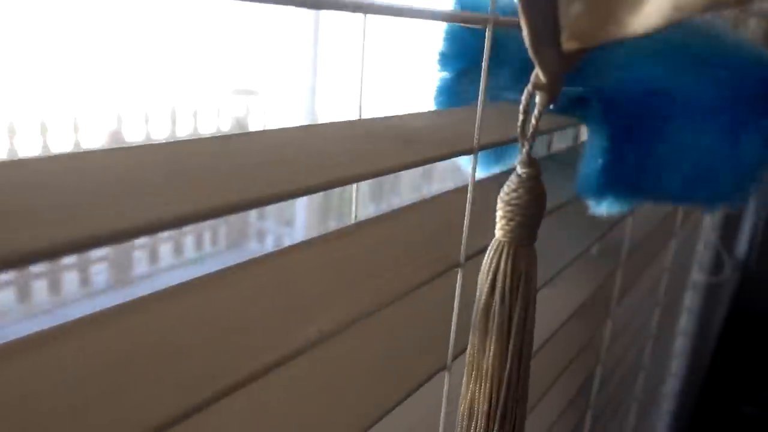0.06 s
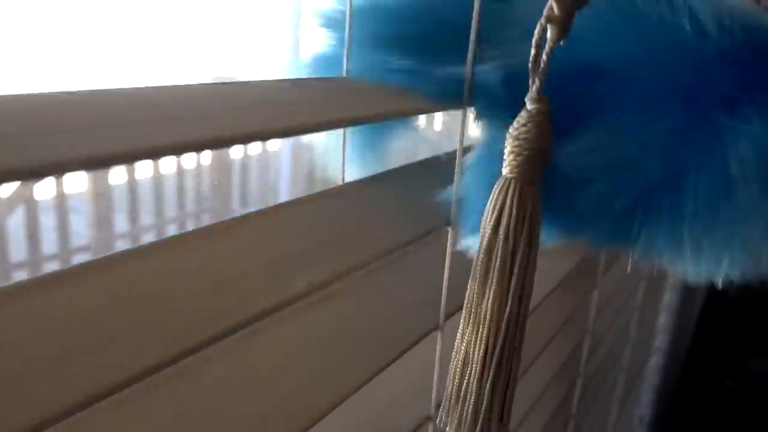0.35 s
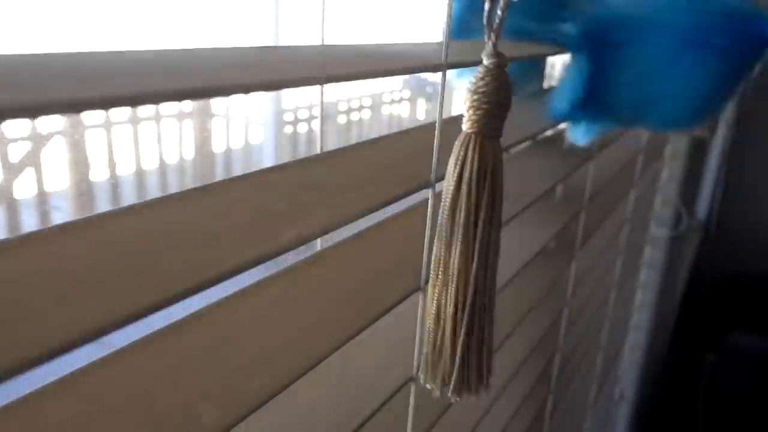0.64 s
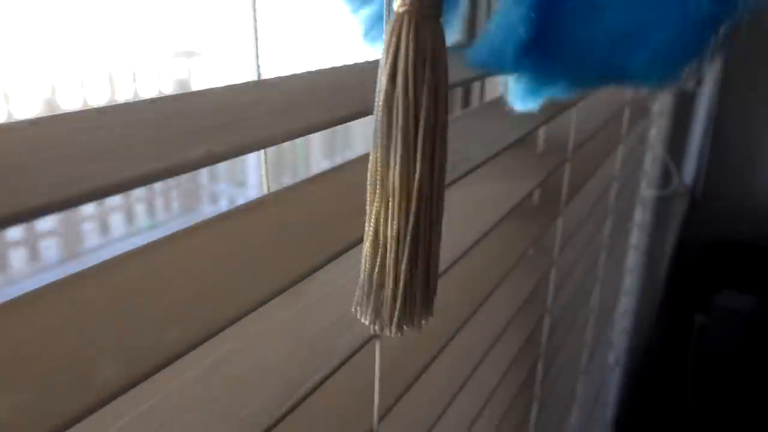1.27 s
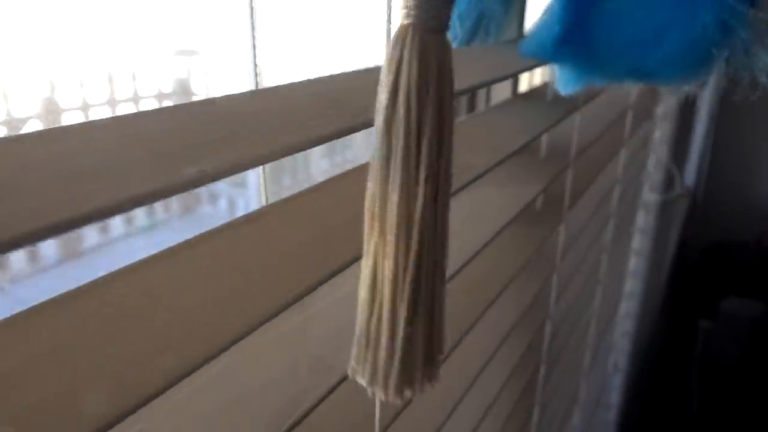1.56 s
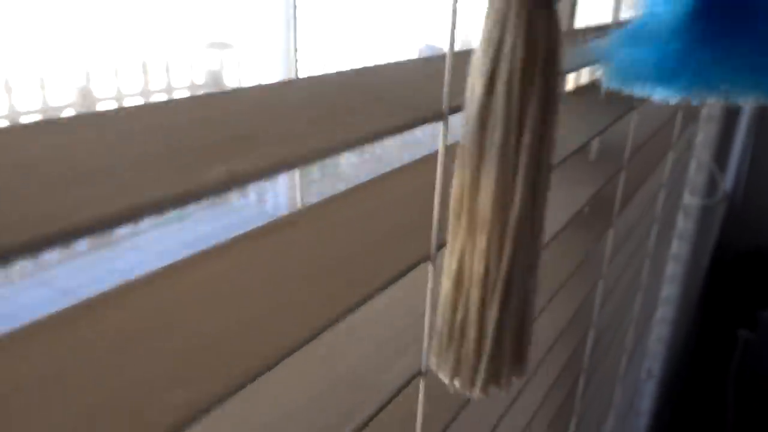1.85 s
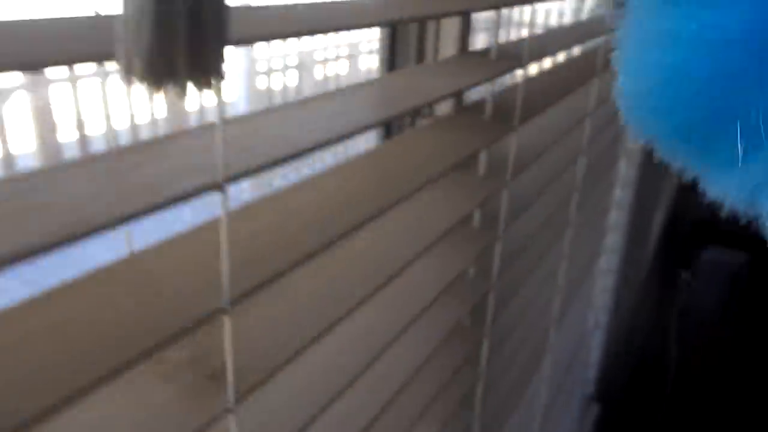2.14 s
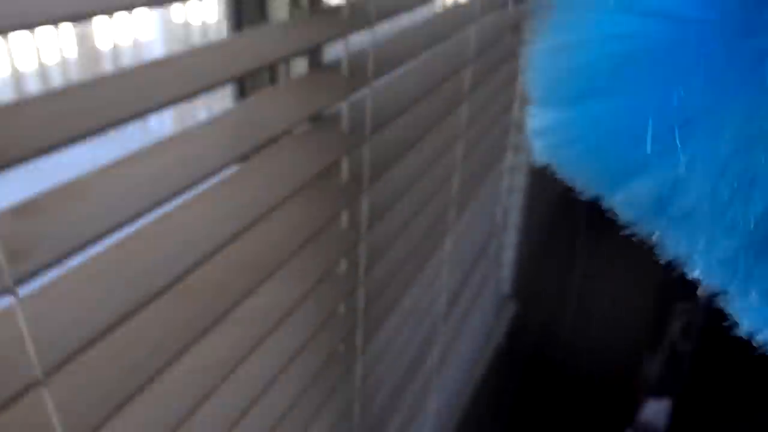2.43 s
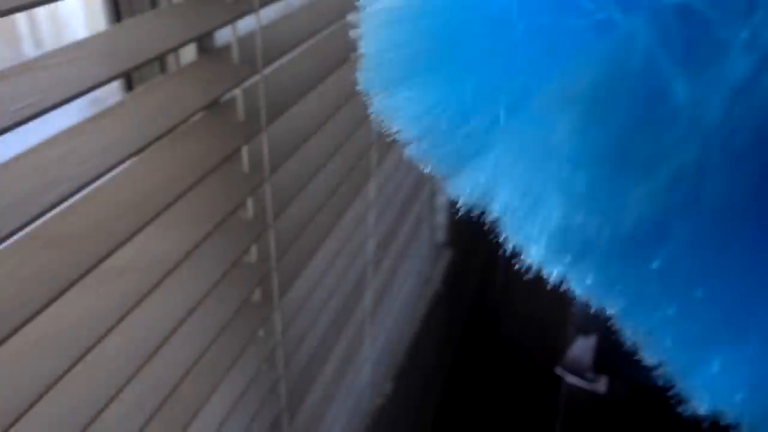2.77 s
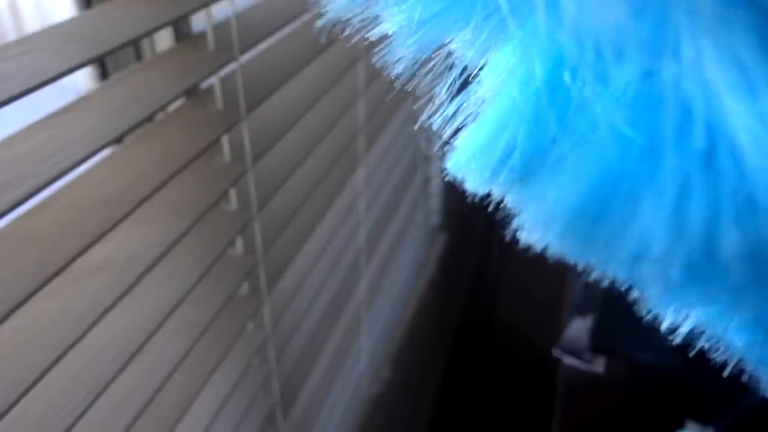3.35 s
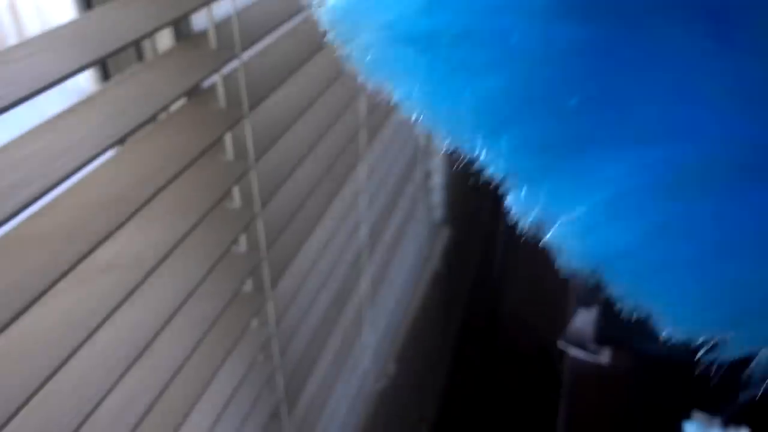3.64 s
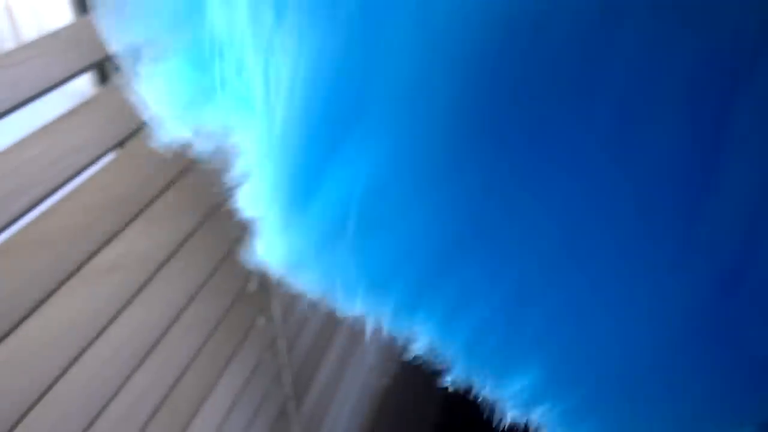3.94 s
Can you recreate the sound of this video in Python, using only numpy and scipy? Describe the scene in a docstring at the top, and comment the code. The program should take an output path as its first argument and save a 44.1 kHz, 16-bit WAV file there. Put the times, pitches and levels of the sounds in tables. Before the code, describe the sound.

A fluffy duster swishes to and fro along window blinds, close to the microphone in a small quiet room. The slats knock and chatter with each stroke, then the duster only rustles faintly over a low rumble.

```python
"""A soft hiss and a clatter of slats: a fluffy duster sweeps to and fro along window blinds,
close to the microphone in a small, quiet room. Its fibres flick over the slats with each stroke,
and the slats knock and chatter against each other, with a short room tail behind them.
Then the duster is drawn back and only rustles faintly, over a low rumble and a soft hum."""
import sys
import numpy as np
from scipy import signal
from scipy.io import wavfile

SR = 44100
rng = np.random.default_rng(int(sys.argv[2]) if len(sys.argv) > 2 else 0)


def unload_wav(signal):
    """Save mono or channel-first audio to the path in sys.argv[1] as 16-bit WAV at rate SR, clipped to [-1, 1]."""
    wavfile.write(
        sys.argv[1],
        SR,
        np.round(np.clip(np.atleast_2d(signal).T, -1, 1) * 32767).astype(np.int16),
    )


N = 176400

# strokes along the slats, and snags as the duster pulls free (start [s], fastest [s], end [s], level [dB])
DUSTER_STROKES = [(-.09, .11, 0.22, -57.5), (.215, .375, 0.45, -51.5), (.4, .423, .44, -56),
                  (.44, .64, 0.74, -53), (.725, .89, 1.044, -52.5), (.94, 1.0, 1.054, -61),
                  (1.04, 1.29, 1.543, -56), (1.56, 1.61, 1.71, -70.5), (1.69, 1.83, 1.975, -60.5)]
# light brushes of the fluff (start [s], fullest [s], end [s], level [dB])
FLUFF_BRUSHES = [(1.9, 2.03, 2.64, -75.5), (2.46, 2.475, 2.75, -71), (2.54, 2.6, 1.9, -96),
                 (2.695, 2.715, 2.73, -74), (2.735, 2.747, 2.78, -71), (2.76, 2.79, 2.94, -79),
                 (2.9, 2.925, 3.03, -71), (3.46, 3.64, 3.69, -75.5), (3.683, 3.691, 3.705, -70),
                 (3.7, 3.735, 3.8, -75), (3.76, 3.8, 3.93, -79), (3.86, 3.98, 4.15, -73)]
# fibres on the slats (frequency [Hz], relative density [dB])
HISS_SPECTRUM = [(1200, -13), (1800, -4), (2400, -15.5), (3400, -12.5), (4500, -8.5), (5600, -4.5),
                 (6900, -6), (8500, -2.5), (10000, -1), (12500, -5.5), (15500, -7)]
# the fluff alone (frequency [Hz], relative density [dB])
FLUFF_SPECTRUM = [(2500, -21), (4200, -10.5), (5500, -10), (7800, -4.5), (10200, -3.5), (12500, -6.5),
                  (15500, -15)]
# slat against slat (time [s], level [dB], thump boost [dB], body boost [dB], treble boost [dB])
SLAT_KNOCKS = [(.0272, -31.5, -2, -3, -2.5), (.0342, -28, 5, 2, -6), (0.3418, -41, 7, 2, -20),
               (0.418, -40, 11, 2, 16), (.424, -49, 17, -7, -3), (.441, -40.5, 16, 7.5, 3),
               (.513, -46, 15, 3, -19), (0.52, -32.5, 3.5, -4.5, -16), (0.644, -43, 3, 8.5, -17),
               (0.6594, -31.5, 0, -13, -12), (.673, -30, -3.5, -6, -9.5), (0.6866, -37, -2, -5, -3.5),
               (0.9099, -40.5, 15, 8.5, -9), (.9133, -36.5, 7, 10, 6), (1.0191, -33.5, 7, 1, 10),
               (1.1085, -39.5, 5.5, 2, -2.5), (1.258, -31.5, -4, 1, -3), (1.2607, -29.5, -4, 4.5, -14),
               (1.2632, -32, -4, 5, -4), (1.274, -31.5, -2, -12, 4.5), (1.459, -39, -10.5, 0, -5),
               (1.523, -46.5, -16, 3, -4), (1.5865, -50, 1, 13, -8), (1.66, -46.5, 0, -9.5, -8),
               (1.843, -46.5, -5, -23, 4.5), (1.957, -53, 3.5, -3, 6.5), (2.1282, -37.5, 1, 5, -11),
               (2.141, -52.5, 10, 13, 2), (2.187, -47.5, 8.5, -10, -11), (2.2479, -44, 1, 1.5, -11),
               (2.6195, -56, -2, 7, 11)]
# a slat edge drags (start [s], strongest [s], end [s], level [dB], bass boost [dB], treble boost [dB])
EDGE_DRAGS = [(0.45, 0.544, 0.56, -48, 1, -1), (1.213, 1.203, 1.264, -45, -3, 1.5),
              (1.432, 1.445, 1.505, -48, -2.5, 3.5), (1.58, 1.588, 1.664, -48, 2.5, -0.5),
              (1.84, 1.845, 1.65, -50, -11, 3), (2.043, 2.128, 2.2, -57.5, 7.5, -7),
              (2.613, 2.622, 2.71, -63.5, 11.5, 3), (2.684, 2.727, 2.8, -59.5, 9, -8),
              (3.978, 3.976, 3.986, -62, -7, 17)]
# low modes of the blind (frequency [Hz], level [dB], t60 [s])
SLAT_MODES = [(158.2, -18.5, 0.18), (196.4, -10, 0.078), (233.7, -8.5, 0.091), (299.6, -15.5, 0.12),
              (357.5, -7, 0.092), (430, -5.5, 0.051), (669, -11.5, 0.077), (765, -3.5, 0.05),
              (966, -2, 0.029), (1139, -24, 0.09), (1430, -12, 0.028)]
# high modes of the slats, too dense to hear singly (frequency [Hz], relative density [dB])
CLACK_SPECTRUM = [(1000, 2.5), (1500, 3.5), (1900, -3.5), (2600, -5.5), (3300, -13), (4500, -15),
                  (7000, -26.5), (15000, -59)]
# still air in the room (frequency [Hz], relative density [dB])
AIR_SPECTRUM = [(110, -7), (150, -19), (220, -10.5), (380, -13.5), (550, -13), (800, -20.5), (1400, -24.5),
                (2200, -28.5), (3500, -36.5), (6000, -41), (15000, -44)]
# low rumble and hum (centre [Hz], width [Hz], level [dB])
RUMBLE_BANDS = [(19.8, 11, -47), (36.6, 2.7, -43), (75.6, 7.9, -45.5), (112.7, 11.5, -57.5),
                (368.3, 9, -68.5)]
# stereo width at the microphone (frequency [Hz], left-right likeness [0..1])
MIC_LIKENESS = [(140, 0.3), (350, 0.9), (700, 0.8), (1400, 0.97), (2500, .5), (4500, .05), (7000, 0),
                (9500, .5), (12000, 0.28), (15000, 0)]
# stereo balance at the microphone (frequency [Hz], left minus right [dB])
MIC_BALANCE = [(300, 1), (1500, 0.2), (3000, 0.5), (5600, 1), (8000, 2), (10000, -1), (12500, -2.5),
               (15000, -4.5)]

HISS_DB, KNOCK_DB, CHATTER_DB, CLACK_DB, SCUFF_DB = 1, 1.5, -4, -12, -9.5   # added to the tables' levels
THUMP_HZ, BODY_HZ, MIDDLE_HZ, TREBLE_HZ = 254, 370, 884, 1780   # ranges that a contact can favour
LN_1000 = np.log(1000)   # a fall of 60 dB


def fibres(moves, spectrum, speed_power, flicks_per_s, flutter_db, flutter_hz=21.7):
    """Fibres flick free, louder the faster the duster moves, unevenly as tufts catch."""
    flutter = rms_one(filtered(rng.standard_normal(N), flutter_hz, "low"))
    flicks = coloured(grains(flicks_per_s, (2, 2, N)), spectrum, low_hz=1095)
    return effort(moves, speed_power) * from_db(flutter_db * flutter) * flicks


def duster_hiss():
    """Thousands of fibres slip over the slats in each stroke and merge into a hiss."""
    hiss = fibres(DUSTER_STROKES, HISS_SPECTRUM, speed_power=1.06, flicks_per_s=7800, flutter_db=0.84)
    return from_db(HISS_DB) * hiss


def duster_rustle(stem_hz=335, echo=0.5):
    """Sparse ticks of the fluff run up and down the duster's stem, ringing evenly spaced modes."""
    ticks = fibres(FLUFF_BRUSHES, FLUFF_SPECTRUM, speed_power=1.1, flicks_per_s=700, flutter_db=0.5)
    round_trip = np.zeros(int(SR / stem_hz) + 1)
    round_trip[0], round_trip[-1] = 1, -echo
    return np.sqrt(1 - echo ** 2) * signal.lfilter([1], round_trip, ticks + 1e-18)


def contact_db(hz, thump_db, body_db, treble_db):
    """The place and hardness of a contact favour the low or the high modes."""
    centres = np.log([THUMP_HZ, BODY_HZ, MIDDLE_HZ, TREBLE_HZ])
    return np.interp(np.log(hz), centres, [thump_db, body_db, 0, treble_db])


def slat_knocks(scatter_db=5, detune=0.041):
    """Each knock rings the low modes of a slat; no two slats are tuned quite alike."""
    out = np.zeros(N)
    hz, mode_db, t60 = np.transpose(SLAT_MODES)
    polarity = (-1) ** (np.arange(len(hz)) // 2)
    t = np.arange(SR // 4)[:, None] / SR
    for time, db, thump, body, treble in SLAT_KNOCKS:
        scatter, mistuning = rng.standard_normal((2, len(hz)))
        levels_db = KNOCK_DB + db + mode_db + contact_db(hz, thump, body, treble) + scatter_db * scatter
        modes = np.sin(2 * np.pi * hz * (1 + detune * mistuning) * t) * np.exp(-LN_1000 * t / t60)
        knock = modes @ (polarity * from_db(levels_db))
        at = int(time * SR)
        out[at:at + len(t)] += knock[:N - at]
    return out


def slat_chatter(slips_per_s=460, shudder_db=-17):
    """Tiny slips shake the low modes: strongly when an edge drags, faintly under every stroke."""
    out = 0
    shudder = from_db(shudder_db) * effort(DUSTER_STROKES, power=1)
    for hz, mode_db, t60 in SLAT_MODES:
        drag = sum(from_db(db + contact_db(hz, bass, bass, treble)) * speed(start, peak, end) ** 2
                   for start, peak, end, db, bass, treble in EDGE_DRAGS)
        slips = (shudder + drag) * grains(slips_per_s, N)
        out = out + from_db(CHATTER_DB + mode_db) * ring(slips, hz, t60)
    return out


def slat_clacks(t60=0.048):
    """The crowded high modes give a short burst at each knock and a scuff while an edge drags."""
    t = np.arange(N) / SR
    power = np.zeros(N)
    for time, db, _, _, treble in SLAT_KNOCKS:
        decay = (t >= time) * np.exp(-LN_1000 * np.clip(t - time, 0, 1) / t60)
        power += (from_db(CLACK_DB + db + treble) * decay) ** 2
    for start, peak, end, db, _, treble in EDGE_DRAGS:
        power += (from_db(SCUFF_DB + db + treble) * speed(start, peak, end) ** 2) ** 2
    return np.sqrt(power) * coloured(rng.standard_normal((2, 2, N)), CLACK_SPECTRUM, low_hz=1027)


def room_tail(direct, level_db=-9, bass_t60=0.66, treble_t60=0.34):
    """The walls return a diffuse tail to the microphone; its treble is wider and dies sooner."""
    t = np.arange(SR) / SR
    reflections = rng.standard_normal((2, SR)) * (1 - np.exp(-t / 0.0018))
    bass = filtered(stereo(reflections, likeness=0.95), 536, "low") * np.exp(-LN_1000 * t / bass_t60)
    treble = filtered(stereo(reflections, likeness=0.3), 1180, "high") * np.exp(-LN_1000 * t / treble_t60)
    response = rms_one(bass + treble) / np.sqrt(SR)
    return from_db(level_db) * signal.fftconvolve(direct, response, axes=1)[:, :N]


def room_mode(direct):
    """One resonance of the room lingers after the knocks."""
    return from_db(-48.5) * ring(direct, hz=406.3, t60=0.9)


def room_tone(air_db=-61.5):
    """Still air all round the microphone, with narrow bands of low rumble and a faint hum."""
    out = from_db(air_db) * coloured(rng.standard_normal((2, 2, N)), AIR_SPECTRUM, low_hz=89)
    for hz, width, db in RUMBLE_BANDS:
        band = filtered(rng.standard_normal((2, N + SR)), [hz - width / 2, hz + width / 2], "band", order=1)
        band = filtered(band, 2 * hz, "low", order=4)[:, SR:]   # one second to settle
        out = out + from_db(db) * rms_one(stereo(band, likeness=0.985))
    return out


def speed(start, fastest, end):
    """A movement speeds up and slows down in two quarter sines."""
    phase = np.interp(np.arange(N) / SR, [start, fastest, end], [0, np.pi / 2, np.pi])
    return np.sin(phase).clip(0)


def effort(moves, power):
    """Strength of the rubbing through a series of movements, as a power of their speed."""
    return sum(from_db(db) * speed(start, fastest, end) ** power for start, fastest, end, db in moves)


def grains(per_s, shape, spread_db=4):
    """Random tiny clicks of uneven size; rms 1."""
    sizes = from_db(spread_db * np.minimum(rng.exponential(1, shape), 3))
    signs = rng.choice([-1, 1], shape)
    return rms_one(sizes * signs * (rng.random(shape) < per_s / SR))


def ring(force, hz, t60):
    """One mode: each push sets a decaying sine ringing."""
    radius, angle = np.exp(-LN_1000 / (t60 * SR)), 2 * np.pi * hz / SR
    feedback = [1, -2 * radius * np.cos(angle), radius ** 2]
    return signal.lfilter([0, np.sin(angle)], feedback, force + 1e-18) / np.sqrt(SR / 1000)


def coloured(sources, spectrum, low_hz):
    """Shape two noise pairs in quarter octaves, with the microphone's width and balance; mid rms 1."""
    out = 0
    edges = np.geomspace(low_hz, 17000, int(4 * np.log2(17000 / low_hz)) + 2)
    for k, (low, high) in enumerate(zip(edges, edges[1:])):
        hz = np.sqrt(low * high)
        pair = filtered(sources[k % 2], [low, high], "band", order=3)   # neighbouring bands are unrelated
        balance_db = at_hz(MIC_BALANCE, hz) * np.array([[.5], [-.5]])
        out = out + stereo(pair, at_hz(MIC_LIKENESS, hz)) * from_db(at_hz(spectrum, hz) + balance_db)
    return out / np.std(out.mean(0))


def stereo(pair, likeness):
    """Left and right from two unrelated signals, used as mid and side."""
    mid = np.sqrt((1 + likeness) / 2) * pair[0]
    side = np.sqrt((1 - likeness) / 2) * pair[1]
    return np.array([mid + side, mid - side])


def filtered(x, hz, kind, order=2):
    """Butterworth filter."""
    return signal.sosfilt(signal.butter(order, hz, kind, fs=SR, output="sos"), x + 1e-18)


def at_hz(curve, hz):
    """Read a curve on a log-frequency axis."""
    frequencies, values = np.transpose(curve)
    return np.interp(np.log(hz), np.log(frequencies), values)


def from_db(db):
    """Decibels to gain."""
    return 10 ** (np.asarray(db) / 20)


def rms_one(x):
    """Scale to rms 1."""
    return x / np.sqrt(np.mean(x ** 2) + 1e-20)


def scene():
    """Duster and blind up close, the room behind them; the faint rustle arrives without a tail."""
    blind = slat_knocks() + slat_chatter() + slat_clacks()
    hiss = duster_hiss()
    rustle = duster_rustle()
    room = room_tail(blind + from_db(-0.5) * hiss) + room_mode(blind)
    return hiss + rustle + blind + room + room_tone()


def record(dry):
    """The microphone's signal is cut steeply at the very top."""
    cutoff_hz = 15800
    return signal.sosfilt(signal.ellip(12, .1, 80, cutoff_hz, fs=SR, output="sos"), dry)


dry = scene()
out = record(dry)
unload_wav(out)
```